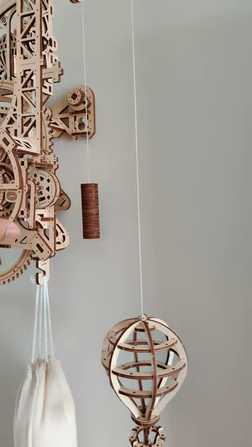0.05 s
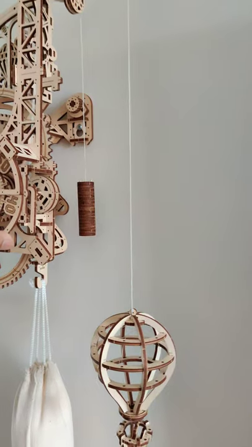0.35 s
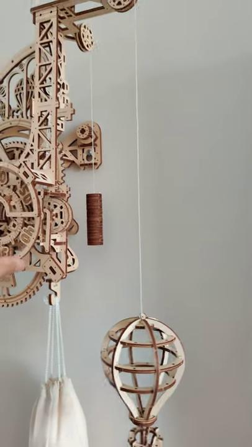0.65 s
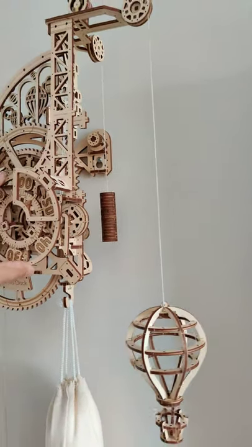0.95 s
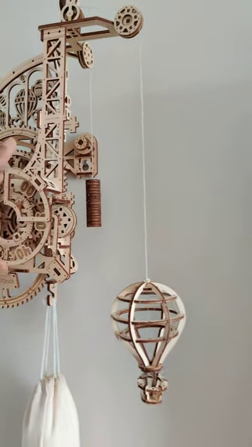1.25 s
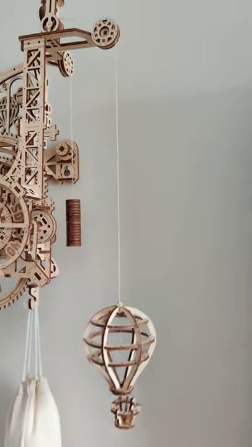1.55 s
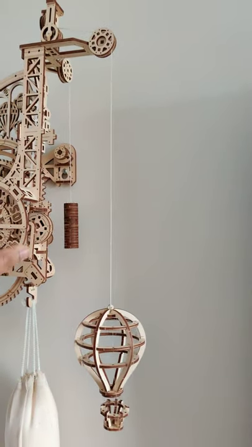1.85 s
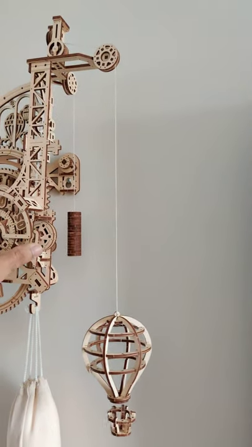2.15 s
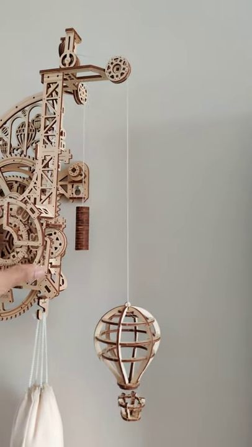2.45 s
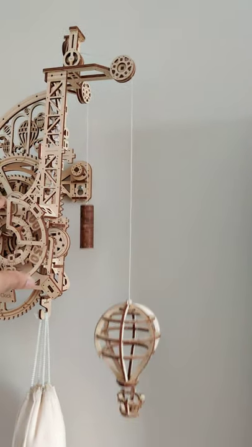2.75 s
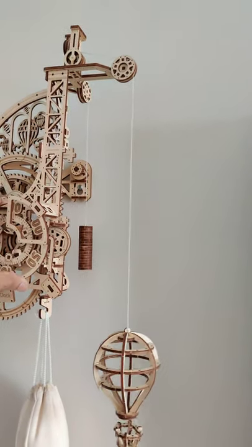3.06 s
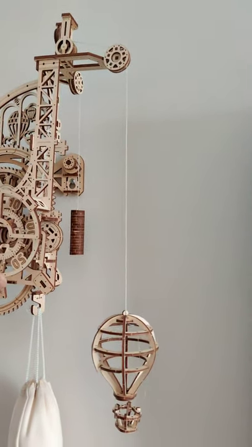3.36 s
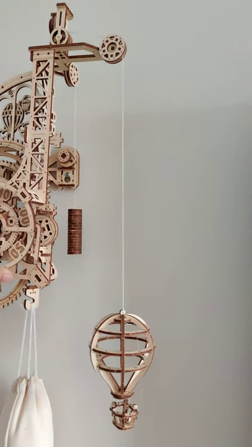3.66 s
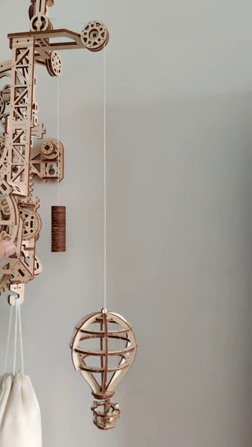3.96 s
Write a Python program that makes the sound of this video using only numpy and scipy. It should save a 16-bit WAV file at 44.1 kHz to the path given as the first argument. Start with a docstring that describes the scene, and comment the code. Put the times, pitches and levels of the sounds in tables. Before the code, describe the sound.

Sharp ratchet clicks from a wooden clock wound by hand, in three uneven runs.

```python
"""A plywood wall clock wound by hand: its ratchet pawl snaps over the teeth in three uneven runs.
Each snap rings the thin wood and returns from a near wall and a small room where an appliance hums.
Gears tick and the hand rubs faintly in the long pause; late on, the shifting frame knocks.
A limiter ducks the hum at every snap."""
import sys
import numpy as np
from scipy import signal
from scipy.fft import rfft, irfft, next_fast_len
from scipy.io import wavfile
from scipy.ndimage import uniform_filter1d, minimum_filter1d

SR = 44100
rng = np.random.default_rng(int(sys.argv[2]) if len(sys.argv) > 2 else 0)


def output_pcm(signal):
    """Save a mono or channel-first signal as 16-bit PCM at the path in sys.argv[1].

    Samples are clipped to [-1, 1] before scaling.
    """
    pcm = np.clip(np.atleast_2d(signal).T, -1, 1) * 32767
    wavfile.write(sys.argv[1], SR, np.round(pcm).astype(np.int16))


N = 176400
TOP_HZ, CRACK_RISE_S = 16200, 0.000472


def undb(db):
    """Decibels to gain."""
    return 10 ** (np.asarray(db) / 20)


def unit(x):
    """Scale to unit energy."""
    return x / np.sqrt(np.sum(x ** 2, axis=-1, keepdims=True))


def colour(x, response):
    """Minimum-phase filter; response rows: f/Hz, gain/dB."""
    n = next_fast_len(x.shape[-1] + 2048, True) // 2 * 2
    hz, db = np.array(response, float).T
    gain_db = np.interp(np.log(np.fft.rfftfreq(n, 1 / SR) + 1), np.log(hz), db)
    cepstrum = irfft(np.log(undb(gain_db)))
    cepstrum[1:n // 2] *= 2
    cepstrum[n // 2 + 1:] = 0
    return irfft(rfft(x, n) * np.exp(rfft(cepstrum)))[..., :x.shape[-1]]


def noise(spectrum):
    """Coloured noise, rms 1."""
    return unit(colour(rng.standard_normal(N), spectrum)) * np.sqrt(N)


def wander(rate_hz):
    """Slow random curve, spread near 1."""
    step = int(SR / rate_hz)
    return uniform_filter1d(np.repeat(rng.standard_normal(N // step + 1), step), step)[:N]


def pan(left_minus_right_db):
    """Left and right gains."""
    return undb(np.array([[left_minus_right_db], [-left_minus_right_db]]) / 2)


def add(out, start_s, x):
    """Mix x in at start_s."""
    i = int(start_s * SR)
    out[:, i:i + x.shape[-1]] += x[:, :N - i]


def appliance():
    """Motor tones and rumble, near the centre, under a wider rush of air; all fade in."""
    # motor hum; fan and motor whine: f/Hz, level/dB
    hum = [(59.2, -29.5), (119.4, -48.5), (151.5, -56.5)]
    whine = [(360.7, -66.5), (414.5, -70.5), (636, -74.5), (769.8, -70.5), (829, -75.5), (888.2, -74),
             (1065, -70.5)]
    # noise spectra: f/Hz, relative density/dB
    rumble_spectrum = [(15, 2.5), (40, 4.5), (55, 7), (72, -32), (92, 5), (108, -13.5), (150, -25),
                       (220, -24.5), (400, -61)]
    air_spectrum = [(100, -16.5), (170, 2), (240, -2), (300, -6.5), (370, -6.5), (470, -11), (640, -8.5),
                    (900, -17), (1080, -17.5), (1300, -22.5), (1900, -25.5), (4100, -34), (4950, -28.5),
                    (6000, -42), (15000, -35.5)]
    # fade-ins: t/s, gain/dB
    bass_fade = [(0, -60), (.05, -55), (.08, -26), (.25, -21), (.28, -2), (.4, 0)]
    air_fade = [(0, -50), (.05, -66), (.075, -14), (.25, -2), (.3, 0), (.4, 5)]
    rotor_hz, rotor_db = 48, -42  # slower rotor, beats against the hum
    rumble_db, rumble_side_db, air_db, wide_above_hz = -42.5, -18, -57, 486
    drift_rad, waver_db = 0.16, 3.44
    t, antiphase = np.arange(N) / SR, np.array([[1], [-1]])
    bass = undb(rumble_db) * noise(rumble_spectrum)
    bass = bass + undb(rumble_db + rumble_side_db) * noise(rumble_spectrum) * antiphase
    air = np.zeros((2, N))
    for hz, db in [(rotor_hz, rotor_db), *hum, *whine]:
        phase = 2 * np.pi * hz * t + drift_rad * wander(rate_hz=8.6)
        amplitude = np.sqrt(2) * undb(db + waver_db * wander(rate_hz=6.7))
        if hz < wide_above_hz:
            bass = bass + amplitude * np.sin(phase)
        else:
            air += amplitude * np.sin(phase + rng.random((2, 1)))
    side_response = [(wide_above_hz / 3, -14), (wide_above_hz, -2), (wide_above_hz * 4, -1)]
    side = colour(noise(air_spectrum), side_response)
    air += undb(air_db) * (noise(air_spectrum) + side * antiphase)
    bass *= undb(np.interp(t, *np.array(bass_fade).T))
    air *= undb(np.interp(t, *np.array(air_fade).T))
    return bass + air


def ratchet():
    """The pawl lands with a crack, shakes loose parts and rings the wood; wall and room return it."""
    # pawl snaps: t/s, level/dB, low knock/dB, pawl ring/dB, treble/dB, left minus right/dB,
    # wall echo/dB, room/dB, wood pitch/ratio
    snaps = [(0.3083, -2.5, -6.5, -2, 1.5, 3, -29, 1, 1.05),
             (0.5065, -1, -6.5, 0.5, -1.5, 2, -5.5, 3, 1.05), (0.6784, 6, -9, 1, 5.5, 1, -9, -0.5, 1.06),
             (.7681, 1.5, -8.5, -0.5, 3.5, -0.5, -5, 3, 1.01),
             (0.8737, 0, -6, -0.5, -2.5, 4, -3.5, 4, 0.98), (1.064, 3, -19, 0.5, 5, 3.5, -10, -2, 1.09),
             (1.1528, 0, -7, 4, 5.5, 5, 1.5, -1, 1.08), (1.218, 0, -8.5, -2, 3, 2.5, 0, 2, .99),
             (1.2863, -2, -2, 0, 3, 0, 0, 2.5, 1.06), (2.6784, 1.5, -11.5, -4.5, 8, 0, -7, 0, 1.02),
             (2.7438, -3.5, 1.5, 3.5, 2, 2.5, -7, 3.5, 0.93), (2.8045, -2, -2, 1, 1, 1.5, -6, 3.5, 0.994),
             (2.852, -4, 2, 2.5, -2, -5, 0.5, 4.5, 1.04), (2.905, -5, 2, 5, 2.5, -5, 1, 5, 0.94),
             (3.1729, 0, -3.5, 0, 1.5, -3, 0.5, 3.5, 1.01), (3.2155, -3, 4.5, 1, 2, 3.5, -1, 3.5, 0.71),
             (3.2596, -4.5, 8, 2, 2.5, -1.5, 7.5, 1.5, 1.08)]
    # landing crack; wall reflection: f/Hz, gain/dB
    crack_spectrum = [(250, -42), (500, -32), (750, -22), (1200, -20), (1480, -25), (1900, -13),
                      (2250, -16), (2900, -8), (4100, -12), (5200, 2), (6300, -3), (7200, 1), (9300, 0),
                      (11800, -3), (15000, 3), (17000, -6)]
    wall_response = [(500, 1.5), (2000, -5), (4000, -0.5), (4900, 7), (6000, -8), (16000, -4)]
    snap_db, wood_db, pawl_hz = 12, -6, 5300
    crack_hold_s, crack_fall_s, chatter_db, chatter_fall_s = 0.0012, 0.0009, -3, 0.0035
    wall_delay_s, wall_db, wall_pan_db = 0.0046, -13.5, 23
    out, t = np.zeros((2, N)), np.arange(SR // 10) / SR
    contact = np.minimum(t / CRACK_RISE_S, 1) * np.exp(-np.maximum(t - crack_hold_s, 0) / crack_fall_s)
    contact += undb(chatter_db) * np.exp(-t / chatter_fall_s)
    for start_s, level_db, knock_db, ring_db, treble_db, pan_db, echo_db, room_db, pitch in snaps:
        tone = [(540, -11),  # thin plywood radiates little bass
                (1080, knock_db), (1081, 0.51 * knock_db), (3040, 0),
                (pawl_hz, ring_db), (8600, 0), (TOP_HZ, treble_db)]
        crack = unit(colour(rng.standard_normal((2, len(t))) * contact, crack_spectrum))
        snap = unit(colour(crack + undb(wood_db) * wood_ring(pitch), tone)) * undb(snap_db + level_db)
        echo = colour(snap, wall_response) * undb(wall_db + echo_db)
        add(out, start_s, snap * pan(pan_db))
        add(out, start_s + wall_delay_s, echo * pan(wall_pan_db))
        add(out, start_s, colour(room_tail(), tone) * undb(snap_db + level_db + room_db))
    return out


def wood_ring(pitch):
    """Damped modes, each reaching each ear with a small random delay."""
    # pawl and plywood frame modes: f/Hz, level/dB, t60/s
    modes = [(650, -19, .04), (885, -15, .035), (1230, -16, .025), (1950, -13, .018), (2650, -14, .008),
             (3150, -15, .007), (4750, -6, .007), (5400, -5, .006), (7100, -8, .006), (8100, -9, .006),
             (9800, -9, .005), (14600, -7, .005)]
    hz, db, t60_s = np.array(modes).T[:, :, None]
    t = np.arange(SR // 10) / SR
    age_s = np.maximum(t - CRACK_RISE_S * rng.random((2, len(hz), 1)), 0)
    rings = np.sin(2 * np.pi * hz * pitch * age_s) * np.exp(-np.log(1000) * age_s / t60_s)
    return (undb(db) * unit(rings)).sum(1)


def room_tail():
    """Diffuse impulse response of the small room; treble dies first."""
    # reverberation bands: f/Hz, level/dB, t60/s
    bands = [(294, 7, 0.96), (780, 1.5, 0.49), (1390, -3.5, 0.37), (3020, -3.5, 0.49), (4430, -4, 0.38),
             (4810, 6, 0.43), (6050, -7.5, 0.43), (8400, -1, 0.32), (11500, -4.5, 0.28), (15100, -4, 0.26)]
    tail_db, build_s, pan_db = -10.5, 0.0025, 1.5
    t = np.arange(SR * 2 // 3) / SR
    log_hz = np.log(np.fft.rfftfreq(len(t), 1 / SR) + 1)
    log_centres = np.log([row[0] for row in bands])
    white, tail = rfft(rng.standard_normal((2, len(t)))), 0
    for share, (_, db, t60_s) in zip(np.eye(len(bands)), bands):
        band = irfft(white * np.interp(log_hz, log_centres, share), len(t))
        tail = tail + undb(db) * band * np.exp(-np.log(1000) * t / t60_s)
    build_up = 1 - np.exp(-(t / build_s) ** 2)
    return unit(tail * build_up) * undb(tail_db) * pan(pan_db)


def gear_ticks():
    """Turning gears touch lightly: short noise bursts."""
    # gear contacts: t/s, level/dB
    ticks = [(1.6368, -24.5), (1.652, -23), (1.759, -21.5), (2.043, -25)]
    # tick colour: f/Hz, gain/dB
    spectrum = [(400, 2), (1300, 5), (2700, -2.5), (4000, -4), (5000, 1), (7500, -6.5), (10000, -18),
                (16000, -14)]
    fall_s = 0.006
    out, t = np.zeros((2, N)), np.arange(SR // 10) / SR
    for start_s, db in ticks:
        burst = rng.standard_normal((2, len(t))) * np.exp(-t / fall_s)
        add(out, start_s, undb(db) * unit(colour(burst, spectrum)))
    return out


def hand_rubs():
    """The hand slides on wood: soft swells of band noise."""
    # rubs: peak t/s, half length/s, level/dB, centre f/Hz, half width at -10 dB/oct
    rubs = [(1.638, 0.034, -58, 3300, 1.1), (1.893, 0.078, -58, 2030, 0.81),
            (2.207, 0.013, -55.5, 10700, 3.9), (2.442, 0.079, -59.5, 4630, 3.2)]
    out, t = np.zeros((2, N)), np.arange(N) / SR
    for peak_s, half_s, db, hz, octaves in rubs:
        band = [(hz / 4 ** octaves, -20), (hz, 0), (hz * 4 ** octaves, -20), (hz * 16 ** octaves, -40)]
        swell = np.exp(-((t - peak_s) / half_s) ** 2)
        out += undb(db) * swell * np.array([noise(band), noise(band)])
    return out


def frame_knocks():
    """The frame shifts under the hand; the soft push stirs only its lowest modes."""
    # hollow knocks: t/s, level/dB
    knocks = [(2.917, -18), (2.939, -15.5), (3.183, -6)]
    # soft push: f/Hz, gain/dB
    soft_contact = [(250, -24), (450, -10), (640, 0), (900, -9), (1600, -28), (4000, -55)]
    out = np.zeros((2, N))
    for start_s, db in knocks:
        mono_ring = wood_ring(pitch=0.95)[:1]
        add(out, start_s, undb(db) * unit(colour(mono_ring, soft_contact)))
    return out


def scene():
    """The clock in its humming room, heard through two unlike ports."""
    # port imbalance: f/Hz, left minus right/dB
    ports = [(250, 0), (600, 1), (3000, 2), (4800, 3.5), (6000, -4.5), (14000, -4)]
    winding = ratchet()
    handling = gear_ticks() + hand_rubs() + frame_knocks()
    handling_reverb = signal.fftconvolve(handling, room_tail(), axes=1)[:, :N]
    left, right = winding + handling + handling_reverb + appliance()
    return np.array([colour(left, [(hz, db / 2) for hz, db in ports]),
                     colour(right, [(hz, -db / 2) for hz, db in ports])])


def record(dry):
    """Look-ahead limiter: ducks at once, holds, releases. Then a steep low-pass."""
    threshold_db, slope, sense_s, hold_s, release_s = -22.5, 0.74, 0.0043, 0.073, 0.028
    ahead, half_hold = int(sense_s * SR), int(hold_s * SR / 2)
    power = uniform_filter1d((dry ** 2).mean(0), ahead)
    level_db = 10 * np.log10(np.abs(power) + 1e-12)
    cut_db = slope * np.minimum(0, threshold_db - level_db)
    held_db = minimum_filter1d(cut_db, 2 * half_hold + 1, origin=half_hold)
    pole = np.exp(-1 / (release_s * SR))
    gain_db = np.minimum(held_db, signal.lfilter([1 - pole], [1, -pole], held_db))
    gain_db = uniform_filter1d(minimum_filter1d(gain_db, 2 * ahead), ahead)
    low_pass = signal.ellip(8, .2, 70, TOP_HZ, fs=SR, output="sos")
    return signal.sosfilt(low_pass, dry * undb(gain_db))


dry = scene()
out = record(dry)
output_pcm(out)
```